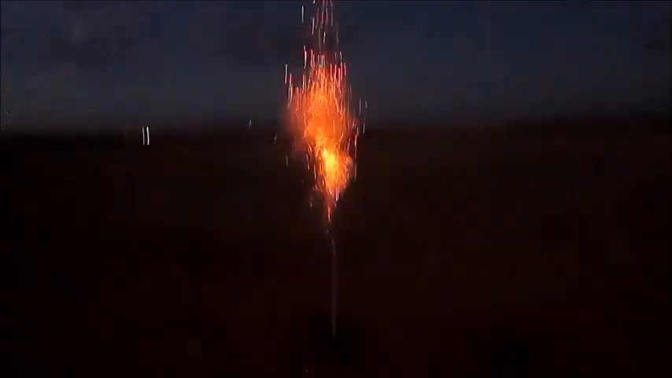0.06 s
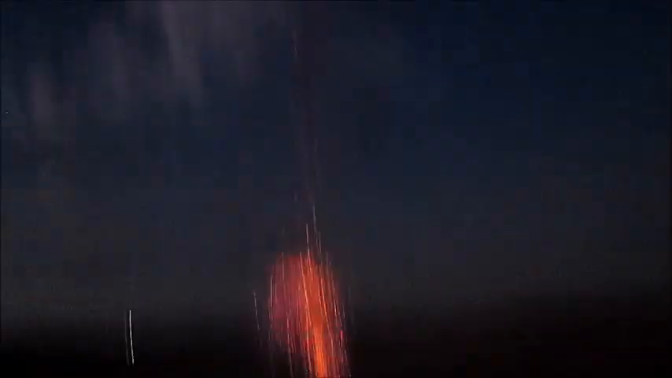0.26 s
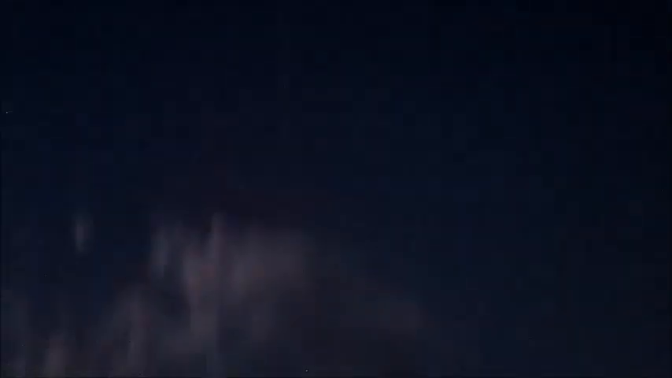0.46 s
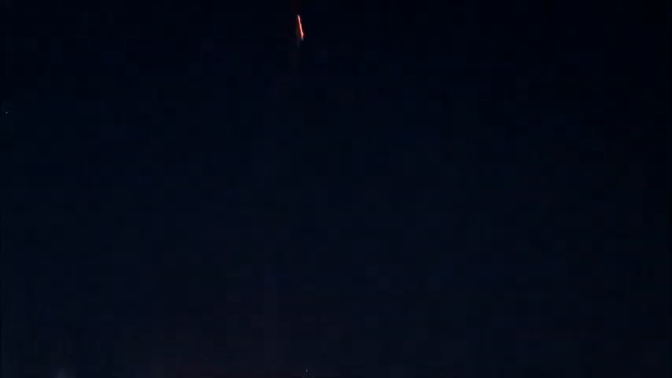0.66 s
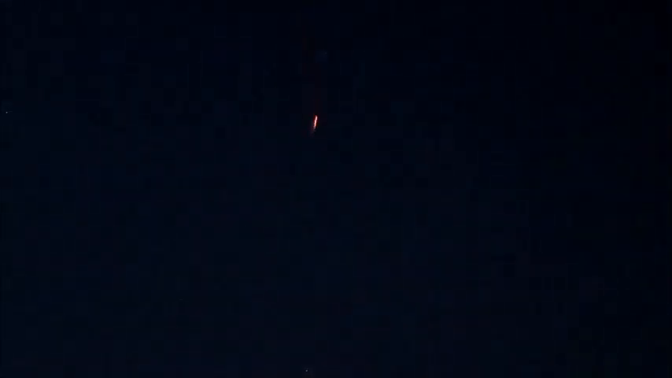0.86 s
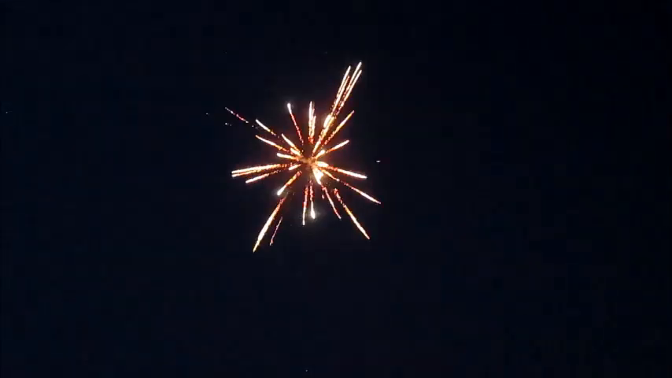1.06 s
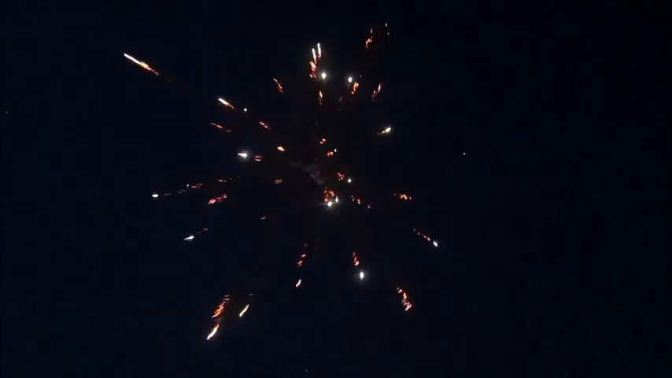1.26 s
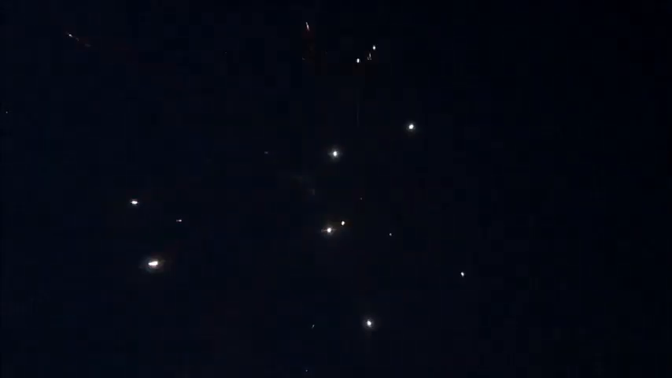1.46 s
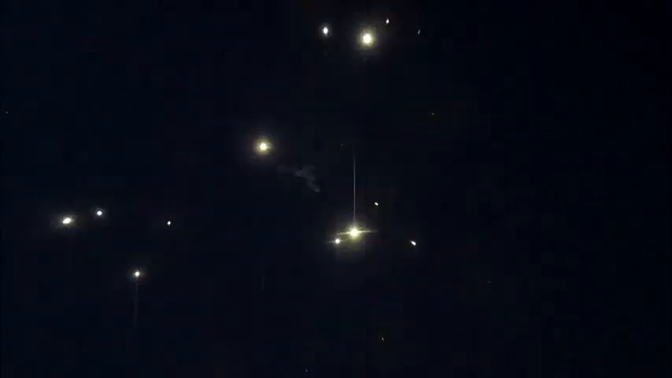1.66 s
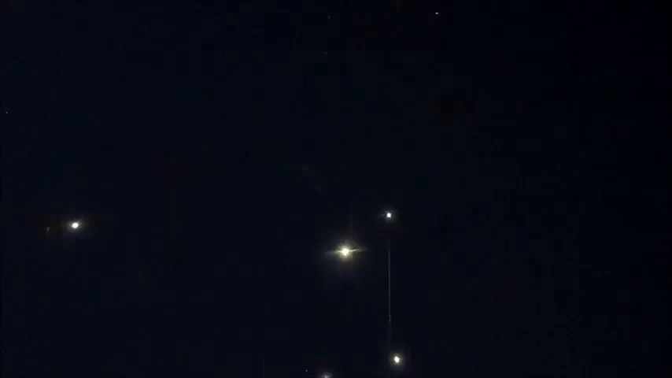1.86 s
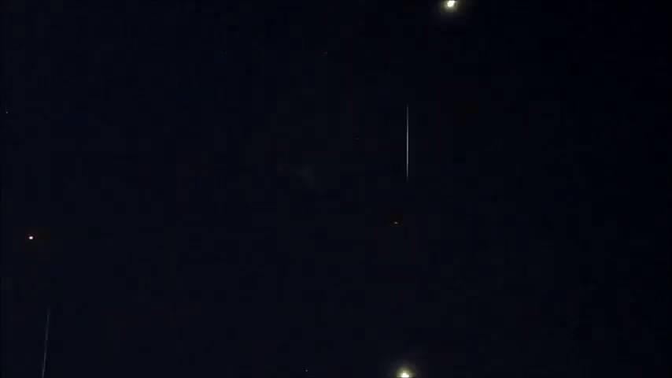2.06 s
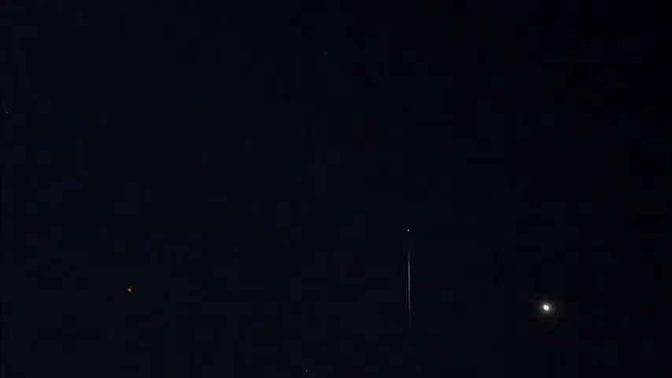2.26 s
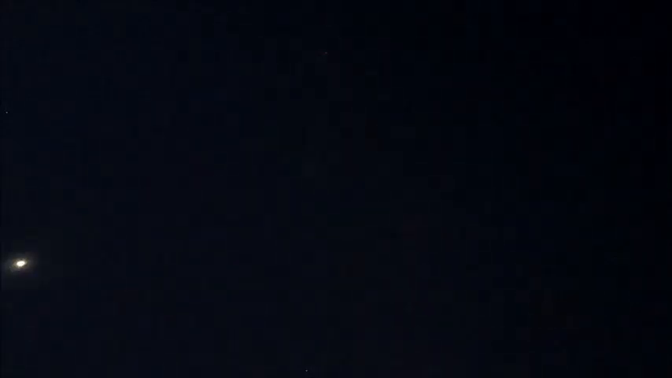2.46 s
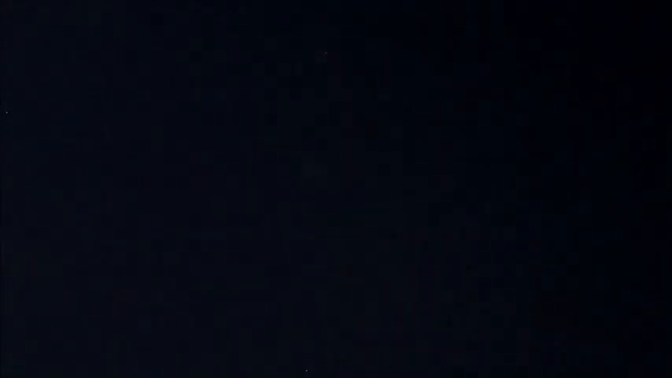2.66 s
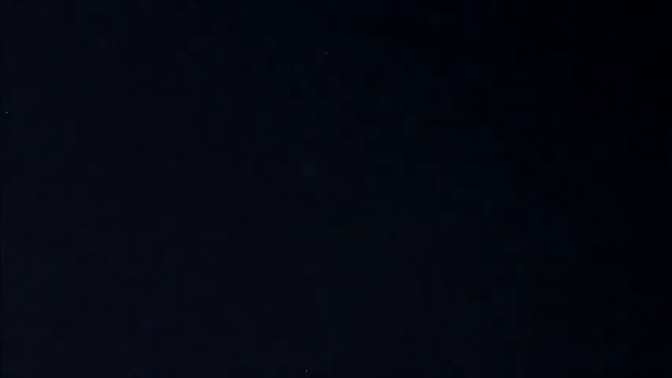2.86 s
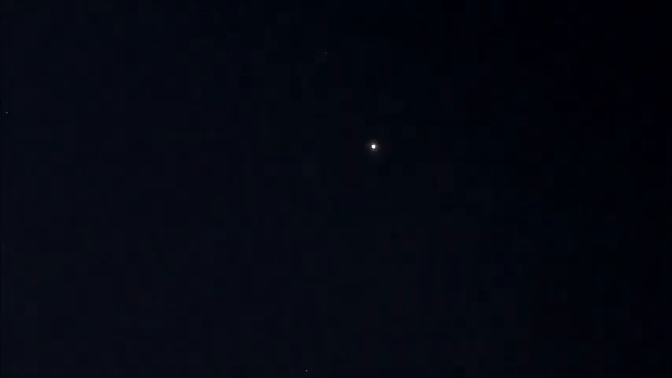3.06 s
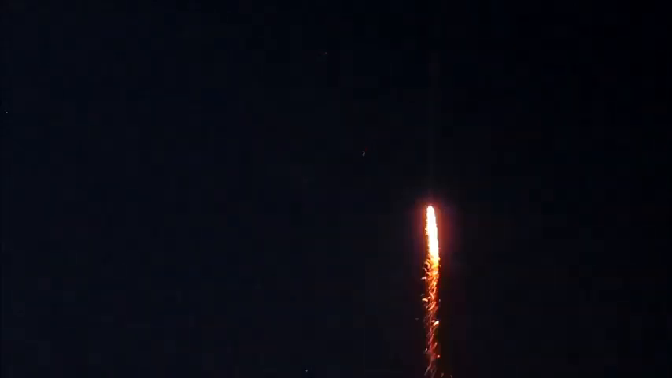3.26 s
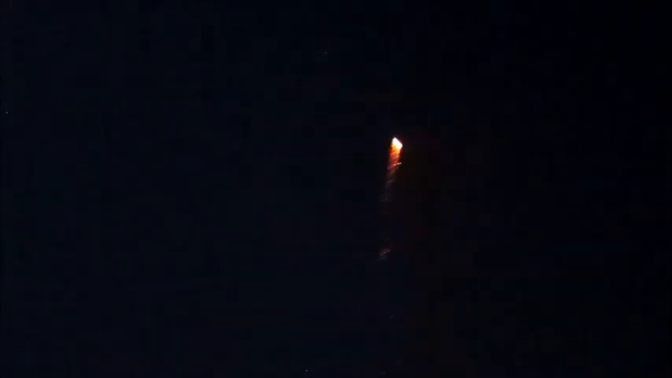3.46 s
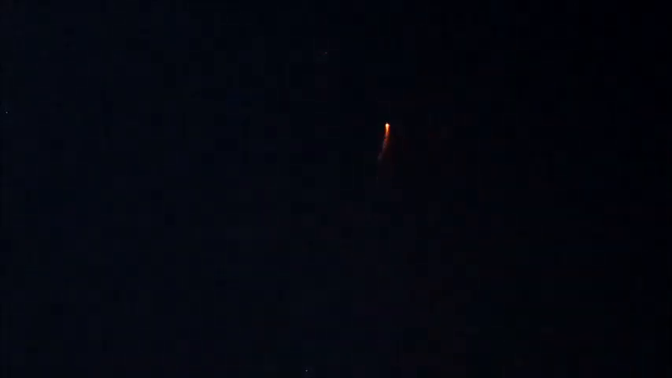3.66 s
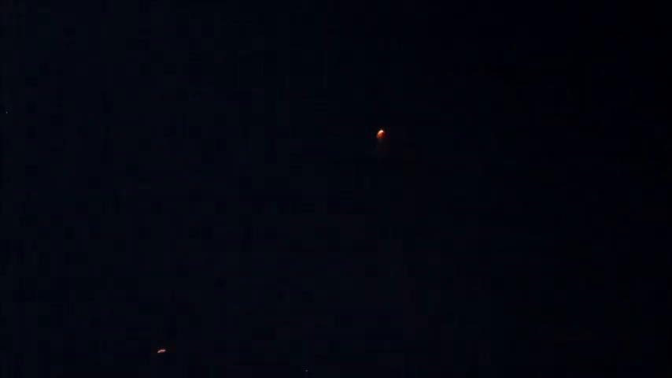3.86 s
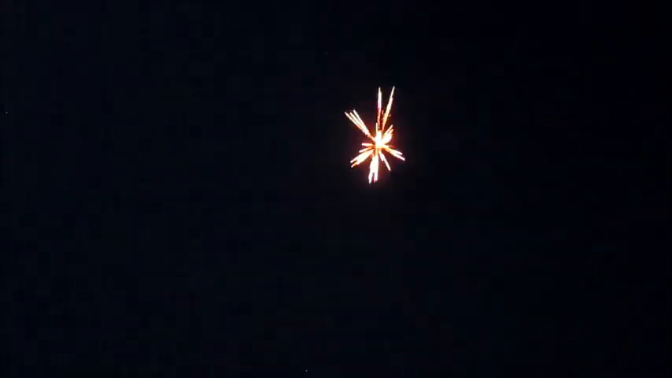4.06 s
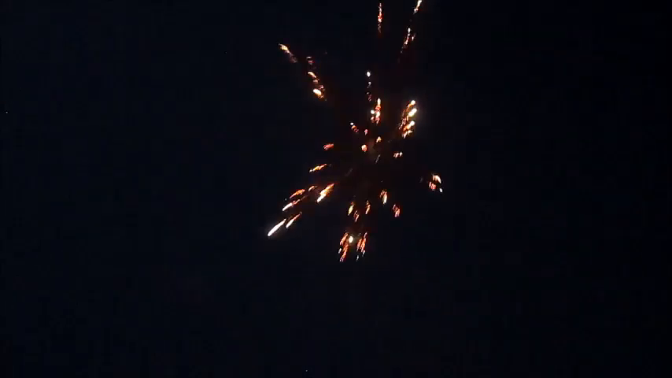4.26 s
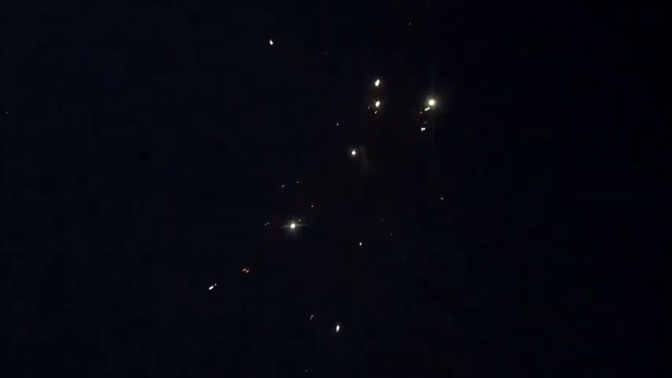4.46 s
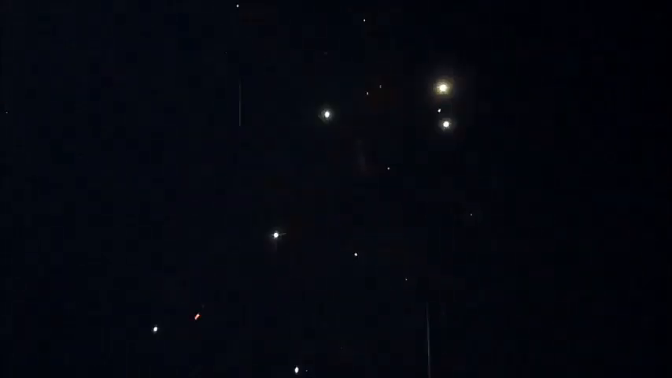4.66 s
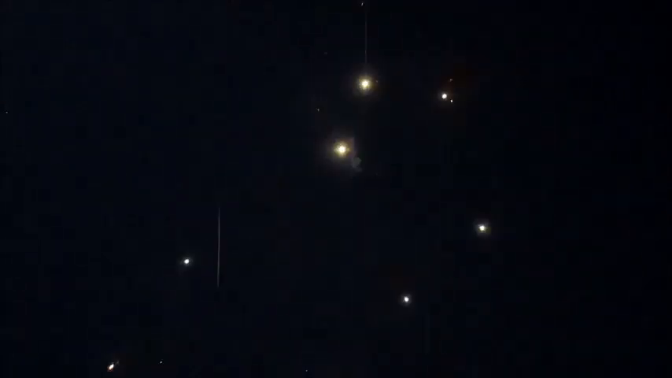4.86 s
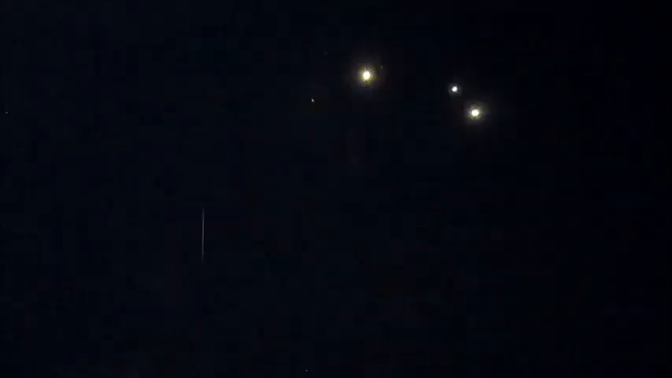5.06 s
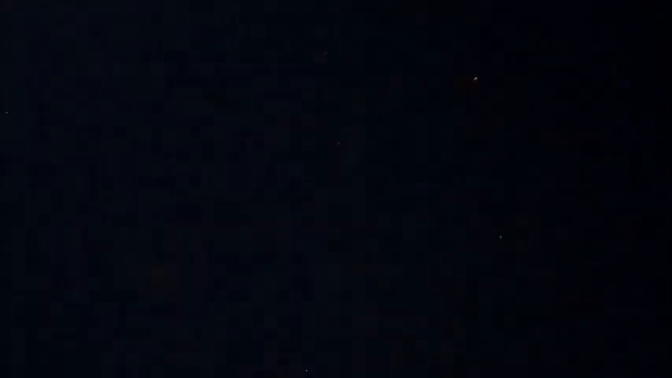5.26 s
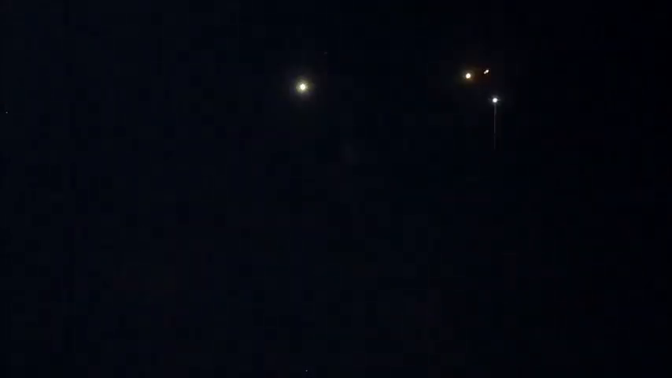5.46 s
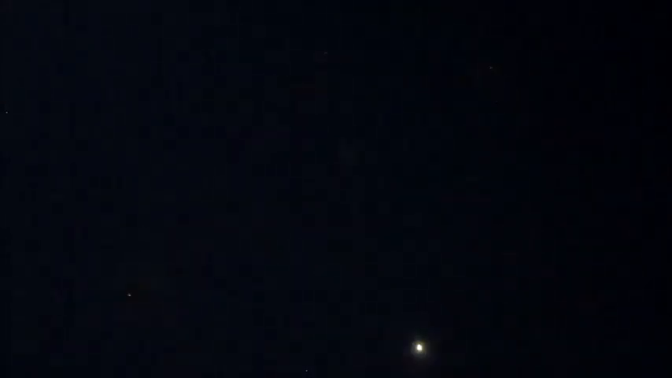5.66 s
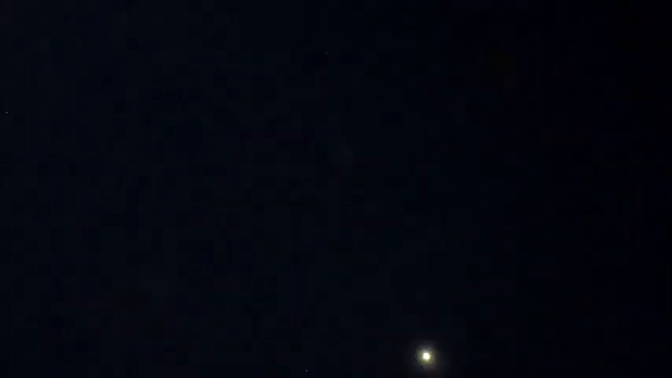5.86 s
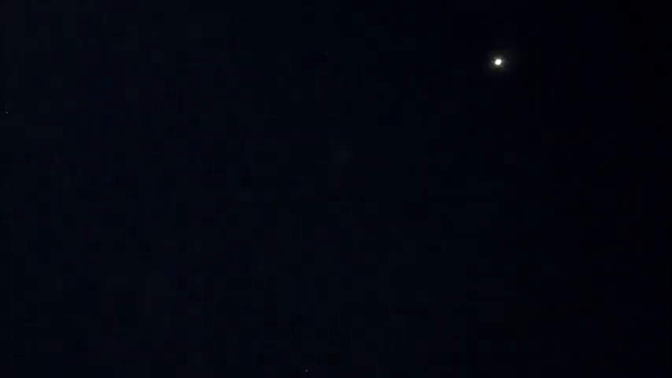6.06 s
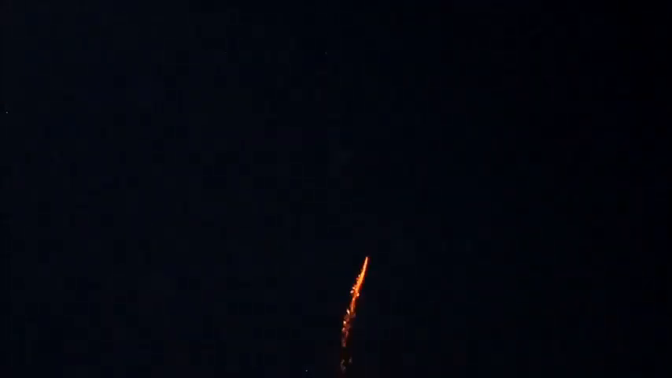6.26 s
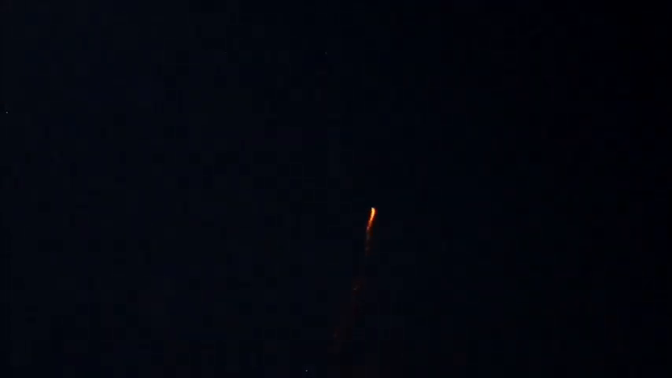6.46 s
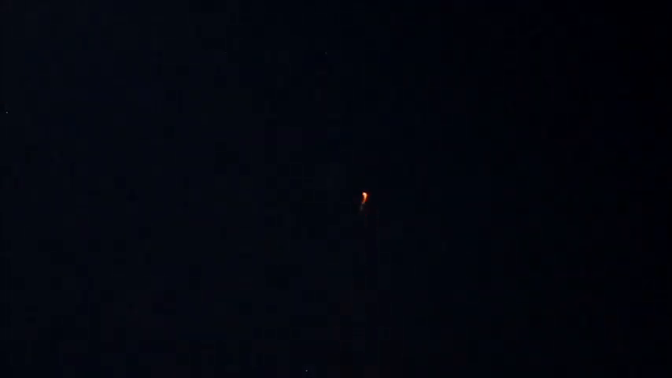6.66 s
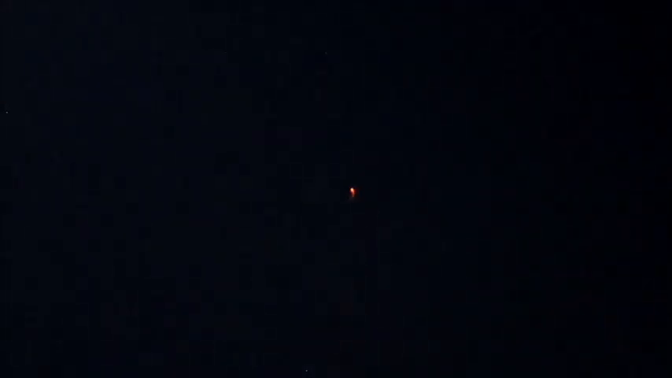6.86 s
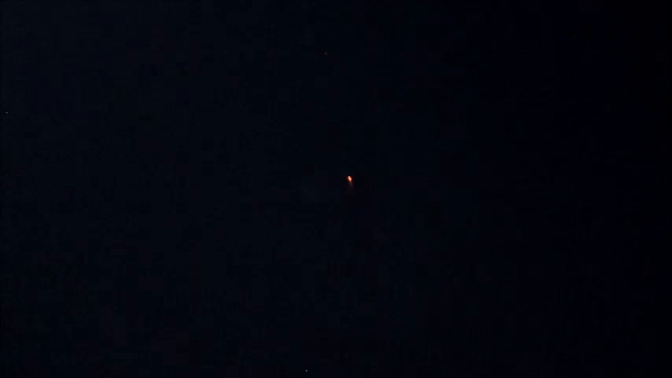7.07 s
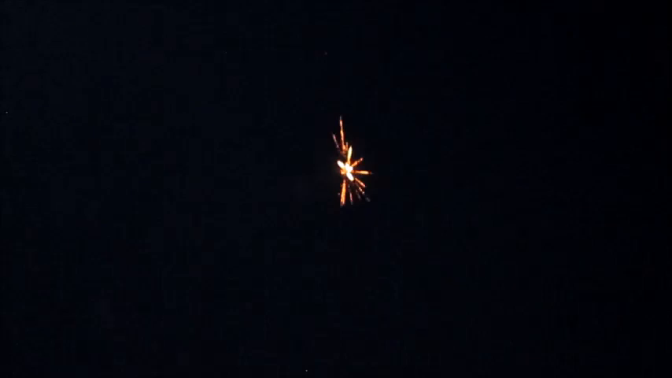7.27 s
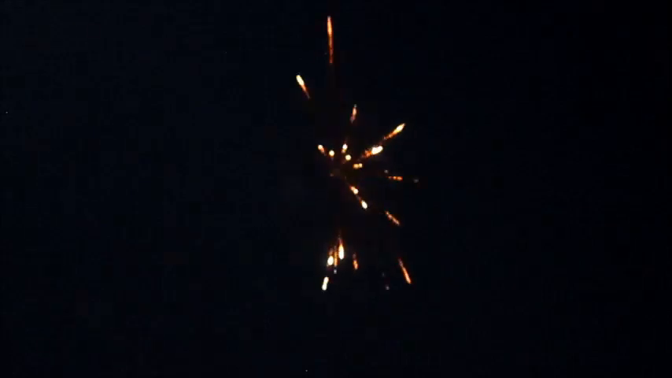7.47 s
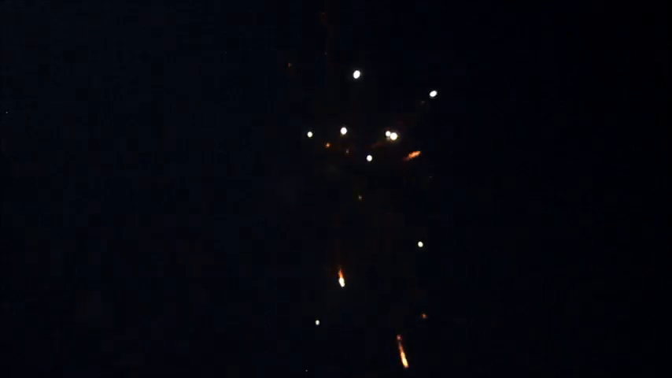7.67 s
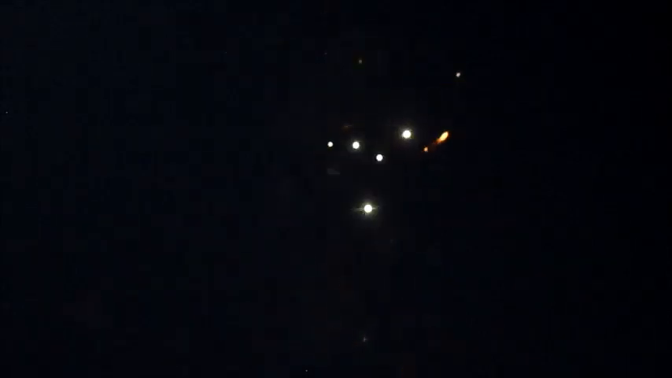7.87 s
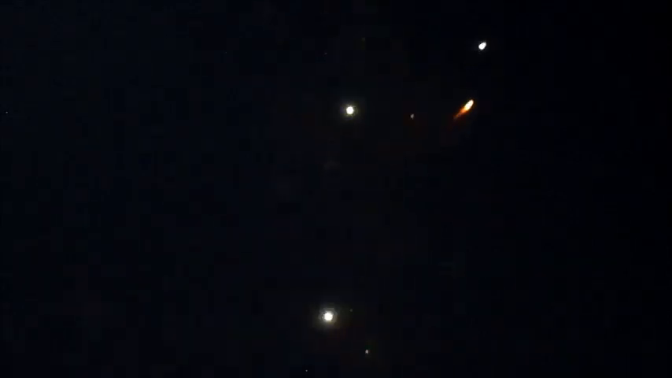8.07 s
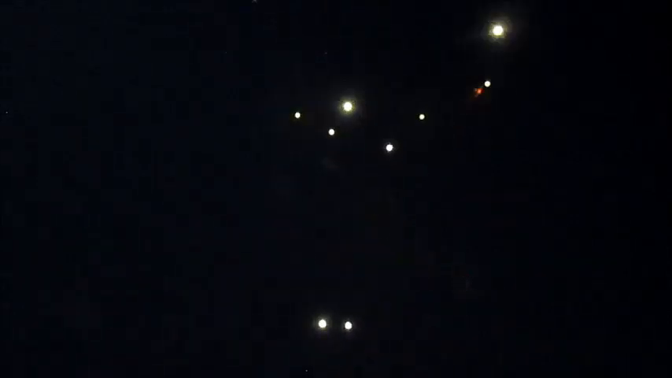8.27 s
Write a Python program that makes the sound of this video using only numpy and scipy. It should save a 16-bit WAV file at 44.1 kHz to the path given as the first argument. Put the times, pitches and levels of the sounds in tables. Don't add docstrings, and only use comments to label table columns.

```python
import sys
import numpy as np
from scipy import signal
from scipy.io import wavfile

SR = 44100
rng = np.random.default_rng(int(sys.argv[2]) if len(sys.argv) > 2 else 0)


def transcribe(signal):
    frames = np.atleast_2d(signal).T
    limited = np.clip(frames, -1, 1)
    pcm = np.round(limited * 32767).astype(np.int16)
    wavfile.write(sys.argv[1], SR, pcm)


def attenuation_scalar(level_db):
    decades = np.asarray(level_db, float) / 20
    return 10 ** decades


N = 366030

BURST_S = [1.05546, 4.12966, 7.35606]
LAUNCH_S = [-.095, 3.09824, 6.07497]
EARLY_S = [0, .0185, .033]
# [answer level/dB, extra edge level/dB]
ANSWERS = [(0, 0), (-3.5, 2), (-4, 2)]


def rms_one(x):
    return x / np.sqrt(np.mean(x ** 2) + 1e-20)


def in_time(rows, after_s=0):
    return np.interp(np.arange(N) / SR - after_s, *np.transpose(rows))


def at_hz(points, hz, order=1):
    points = np.array(points)
    return np.interp(np.log(hz), np.log(points[:, 0]), points[:, order])


def band(x, low_hz, high_hz):
    return signal.sosfilt(signal.butter(2, [low_hz, high_hz], "band", fs=SR, output="sos"), x)


def dull(x, cut_hz):
    return signal.sosfilt(signal.butter(2, min(cut_hz, .45 * SR), fs=SR, output="sos"), x)


def drift(rate_hz):
    r = np.exp(-80 * np.pi * rate_hz / SR)
    white = rng.standard_normal(N // 40 + 2002)
    slow = signal.lfilter([1], [1, -2 * r, r * r], white)[2000:]
    return np.interp(np.arange(N) / 40, np.arange(len(slow)), rms_one(slow))


def ring(clicks, hz, t60):
    r = attenuation_scalar(-60 / (t60 * SR))
    w = 2 * np.pi * hz / SR
    return signal.lfilter([0, np.sin(w)], [1, -2 * r * np.cos(w), r * r], clicks + 1e-18)


def coloured(spectrum, patchy_db, rate_hz):
    edges = 20 * 2 ** np.arange(0, 9.9, 1 / 3)
    white = rng.standard_normal((2, N))
    out = 0
    for k, (low, high) in enumerate(zip(edges, edges[1:])):
        hz = np.sqrt(low * high)
        if spectrum[0][0] < hz < spectrum[-1][0]:
            gain = attenuation_scalar(at_hz(spectrum, hz) + patchy_db * drift(rate_hz))
            out = out + gain * band(white[k % 2], low, high)
    return rms_one(out)


def notched(x):
    dips_hz = [3950, 8000]
    for hz in dips_hz:
        x = signal.lfilter(*signal.iirnotch(hz, hz / 170, fs=SR), x)
    return x


def ticks(size, per_s, depth):
    hits = (rng.random(size) < per_s / SR) * rng.uniform(.3, 1, size)
    return 1 - depth + depth * rms_one(dull(hits, 170))


def roll(table, ms, build_ms):
    white = rng.standard_normal((2, len(ms)))
    after = np.maximum(ms, 0)
    edges = 40 * 2 ** np.arange(0, 9, .5)
    out = 0
    for k, (low, high) in enumerate(zip(edges, edges[1:])):
        hz = np.sqrt(low * high)
        decay_db = 0.057 * after / at_hz(table, hz, order=2)
        out = out + attenuation_scalar(at_hz(table, hz) - decay_db) * band(white[k % 2], low, high)
    return 3.0 * notched(out) * (1 - np.exp(-after / build_ms))


def blast(ms, push_db, push_ms, suction_db, suction_ms, rise_ms=0.011):
    push = np.clip(ms / rise_ms + .5, 0, 1) * np.cos(np.pi / 2 * np.clip(ms / push_ms, 0, 1))
    suction = np.sin(np.pi * np.clip((ms - push_ms) / suction_ms, 0, 1) ** .75)
    return attenuation_scalar(push_db) * push - attenuation_scalar(suction_db) * suction


def add(out, s, voice, *row):
    start = round(s * SR) - 1323
    at = np.arange(start, start + 24000)
    out[at[at >= 0]] += voice((at / SR - s) * 1000, *row)[at >= 0]


def launch(ms, push_ms, lag_ms, puff_db, suck_db, leak_db, roll_db, fence_db):
    # [f/Hz, level/dB per Hz, t60/s]
    field_roll = [(60, -1.5, .15), (300, -1.5, 0.23), (895.7, -5, 0.38), (2000, -8, 0.42),
                  (3470, -13.5, .35), (6760, -23.5, 0.28), (14000, -37, .15)]
    # [f/Hz, level/dB per Hz, t60/s]
    fence_roll = [(100, 3, 0.21), (470, 8, 0.21), (1440, -5.5, 0.71), (3500, -10.5, 0.74),
                  (6600, -15, 0.16), (14000, -34, 0.13)]

    before = np.minimum(ms, 0)
    sizzle = rms_one(band(rng.standard_normal(len(ms)), 350, 2600))
    swell = (np.exp(before / 2.9) + 0.1 * np.exp(before / 6.8)) * (ms < -.4)
    leak = attenuation_scalar(leak_db) * sizzle * swell
    puff = dull(blast(ms + .62, puff_db, .36, suck_db, .4, rise_ms=.2), 5000)

    muzzle = blast(ms, 13, push_ms, -30, .1)
    ground = dull(blast(ms - lag_ms, 7.5, push_ms, -40, .1, rise_ms=.08), 6500)
    after = np.maximum(ms - .8 * push_ms, 0)
    fade = np.exp(-after / 5.2 - (after / 13) ** 4) * (after > 0)
    swing = -attenuation_scalar(.5) * np.cos(2 * np.pi * .07 * after) * fade
    report = dull(muzzle + ground + swing, 9000)

    post = np.sqrt(np.maximum(ms - 103, 0) / .3 + 81) - 9
    picket = .45 + 1.4 * np.exp(-(post % 1) / .3)
    fence = attenuation_scalar(fence_db) * picket * roll(fence_roll, ms - 103, build_ms=0.43)
    field = roll(field_roll, ms, build_ms=3.0) * (1 + 6 * np.exp(-np.maximum(ms, 0) / 12.0))
    return leak + puff + report + attenuation_scalar(roll_db) * field + fence


def ducking():
    depth_db, hold_s, launch_recover_s, burst_recover_s = 10, 0.083, 0.68, 1

    def dip(s, recover_s):
        return in_time([(0, 0), (.01, -depth_db), (hold_s, -depth_db), (hold_s + recover_s, 0)], s)

    dips = [dip(s, burst_recover_s) for s in BURST_S] + [dip(s, launch_recover_s) for s in LAUNCH_S]
    return np.min(dips, axis=0)


def air():
    # [f/Hz, level/dB per Hz]
    wind_colour = [(12, -37), (20, -11), (32, -3), (82, 2), (254, -16.5), (297, -14.5), (356, -19),
                   (450, -19.5), (580, -50.5), (990, -120)]
    # [t/s, level/dB]
    rumble_course = [(0, -47), (.5, -48), (1, -45.5), (1.55, -52), (1.72, -37.5), (1.85, -51.5), (3, -46.5),
                     (3.7, -48.5), (4.1, -50), (4.6, -47.5), (4.8, -51.5), (5.3, -51), (5.7, -48), (6, -47),
                     (6.7, -49), (7.3, -49.5), (7.85, -46.5), (8.3, -49)]
    # [f/Hz, level/dB per Hz]
    hiss_colour = [(2200, -18.5), (3000, -4), (3700, -8), (4500, -8.5), (6100, -12.5), (8000, -18),
                   (11000, -23), (15000, -22.5), (17500, -26)]
    # [f/Hz, level/dB per Hz]
    hum_colour = [(120, -32.5), (200, -3.5), (611, -8), (1000, -12), (1700, -20), (2000, -24.5),
                  (2600, -32), (3400, -57)]

    hiss_db, hiss_fall_db_per_s = -71.5, 1.2
    hum_db, hum_fall_db_per_s = -55.5, 0.33
    t = np.arange(N) / SR
    duck_db = ducking()
    wind = attenuation_scalar(in_time(rumble_course) + duck_db) * coloured(wind_colour, patchy_db=1.0, rate_hz=1.2)
    hiss_gain = attenuation_scalar(hiss_db - hiss_fall_db_per_s * t + 0.092 * duck_db)
    hiss = hiss_gain * coloured(hiss_colour, patchy_db=3.0, rate_hz=8.3)
    hum_gain = attenuation_scalar(hum_db - hum_fall_db_per_s * t + 0.98 * duck_db)
    hum = hum_gain * coloured(hum_colour, patchy_db=1.0, rate_hz=10.0)
    return wind + hiss + hum


def tube():
    # [start t/s, f/Hz, level/dB]
    pipe_modes = [(.3, 2150, -82), (5.3, 2173, -78), (.4, 2790, -76), (0.401, 3200, -72.5),
                  (2.2, 2770, -75), (2.199, 3130, -72), (2.301, 2100, -77), (3.4, 2130, -74),
                  (3.4, 3190, -77), (3.4, 3740, -83.5), (5.3, 2780, -77), (5.3, 3700, -85),
                  (6.35, 2250, -76.5), (6.5, 3210, -83)]
    t60 = 1.7 / 170
    out = np.zeros(N)
    for start, hz, db in pipe_modes:
        end = min(s for s in BURST_S + LAUNCH_S if s > start)
        at = np.arange(round(start * SR), round(end * SR))
        white = rng.standard_normal(len(at))
        tone = rms_one(ring(ring(white, hz, t60), hz, t60))
        fade_in = np.minimum(1, (at / SR - start) / 0.11)
        out[at] += attenuation_scalar(db) * tone * fade_in
    return out * attenuation_scalar(1.5 * drift(12.0))


def knocks():
    # [t/s, peak level/dB, f/Hz]
    gust_hits = [
        (0.347, -31.5, 100),
        (6.75, -38.5, 210),
    ]
    out = np.zeros(N)
    for s, db, hz in gust_hits:
        body = ring(ring(np.arange(6000) == 0, hz, 2.5 / hz), hz, 2.5 / hz)
        out[round(s * SR):][:6000] += attenuation_scalar(db) * body / np.abs(body).max()
    return out


def sputter():
    # [t/s, length/s, level/dB]
    flares = [(.5, 0.18, -76), (.605, .02, -81), (0.67, 0.071, -72), (0.845, 0.073, -77),
              (.945, 0.013, -71), (1.48, 0.052, -63), (1.712, .03, -74), (1.851, 0.099, -67),
              (1.917, 0.25, -56), (2.157, 0.033, -60.5), (2.167, 0.208, -58.5), (2.395, 0.027, -72),
              (2.474, 0.13, -62), (2.61, .02, -72), (2.64, .025, -68), (2.974, 0.099, -52.5),
              (3.115, .11, -63)]
    # [f/Hz, level/dB per Hz]
    powder_colour = [(1530, -34), (2600, -4.5), (3200, 0.5), (3850, -5), (4190, -3), (6500, 0), (8060, -7),
                     (9480, -4.5), (12500, -18), (16400, -27.5)]
    t = np.arange(N) / SR
    gain = np.zeros(N)
    for s, length, db in flares:
        arch = np.abs(np.sin(np.pi * np.clip((t - s) / length, 0, 1)))
        gain += attenuation_scalar(db) * arch ** .9
    return gain * coloured(powder_colour, patchy_db=2.0, rate_hz=25.0)


def burst(ms, push_ms, suction_ms, lag_ms, echo_db, bounce_db, roll_db, wall_db):
    # [f/Hz, level/dB per Hz, t60/s]
    field_roll = [(100, -13.5, .1), (400, -6, .12), (700, -3.5, 0.19), (1260, -1.5, 1), (2000, -7.5, 0.45),
                  (3500, -14.5, 0.69), (6660, -15.5, 0.17), (14000, -36, 0.11)]
    # [f/Hz, level/dB, t60/s]
    near_rings = [(1040, -24.5, 0.013), (1561, -13.5, 0.009), (2303, -22.5, 0.011), (3300, -23.5, 0.0077),
                  (60, -30.5, .05)]
    # [f/Hz, level/dB per Hz, t60/s]
    wall_roll = [(200, -9, 0.19), (457, 9.5, 0.16), (1010, 4, 0.62), (1790, -9, 0.18), (4000, -34, 0.34),
                 (14000, -60, .2)]

    direct = dull(blast(ms, 14, push_ms, 4, suction_ms), 11000)
    bounce = attenuation_scalar(bounce_db) * dull(blast(ms - 1.55, -6, .15, 0.5, .5), 5000)
    echo = blast(ms - lag_ms, 2.5, 1.2 * push_ms, 4.5, 1.1 * suction_ms, rise_ms=.2)
    ground = attenuation_scalar(echo_db) * dull(np.tanh(echo), 6500)

    half_sample_ms = 500 / SR
    kicks = 1. * (np.abs(ms - 1.3) < half_sample_ms) + .55 * (np.abs(ms - lag_ms - 1.2) < half_sample_ms)
    ringing = sum(attenuation_scalar(db) * ring(kicks, hz * rng.uniform(0.72, 1.3), t60) for hz, db, t60 in near_rings)

    close = roll(field_roll, ms - .9, build_ms=.3) * np.exp(-np.maximum(ms, 0) / 2.6)
    surge = 1 + 2.6 * np.exp(-np.maximum(ms - lag_ms, 0) / 11.0)
    field = roll(field_roll, ms - lag_ms, build_ms=0.18) * surge
    grain = ticks(len(ms), per_s=120.0, depth=0.35)
    wall = attenuation_scalar(wall_db) * grain * roll(wall_roll, ms - 78, build_ms=1.8)
    return direct + bounce + ground + ringing + attenuation_scalar(roll_db + 11.5) * close + attenuation_scalar(roll_db) * field + wall


def pops():
    lags_s = [.2565, .2855, .3565, .4275, .4395, .4715, .4815, .5905, .6095, .6455, .6605, .6785, .7025,
              .7265, .7895, .8205, .8345, .9135, .9935, 1.0265, 1.1405]
    # [peak level/dB, f/Hz, edge level/dB]
    reflectors = [(-41, 900, -5), (-42, 700, -5), (-42, 1090, -10), (-42, 800, -5), (-43, 800, 0),
                  (-44, 900, -3), (-42, 800, 0), (-43, 690, -1), (-41, 750, 1), (-43, 900, -3),
                  (-35, 1000, -2), (-40, 910, -1), (-43, 1000, -1), (-34, 850, -8), (-47, 1450, 0),
                  (-41, 656, 1), (-42, 970, 0), (-36, 1050, -6), (-45, 1000, -5), (-38, 1030, -5),
                  (-35, 1250, -6)]
    cycles = 6
    out = np.zeros(N + SR)
    click = np.arange(900) == 0
    for s, early_s, (answer_db, bright_db) in zip(BURST_S, EARLY_S, ANSWERS):
        for lag_s, (db, hz, edge_db) in zip(lags_s, reflectors):
            hz = hz * rng.uniform(.93, 1.07)
            body = ring(ring(click, hz, cycles / hz), hz, cycles / hz)
            edge = dull(ring(click, 2.2 * min(hz, 1050), 4.5 / hz), 3300)
            pop = body / np.abs(body).max() + attenuation_scalar(edge_db + bright_db) * edge
            out[round((s + lag_s - early_s) * SR):][:900] += attenuation_scalar(db + answer_db) * pop
    return out[:N]


def land():
    # [t after the burst/s, level/dB]
    scatter = [(.24, -50.5), (.4, -57), (.43, -51.5), (.495, -50.5), (.52, -57.5), (.58, -56), (.66, -46.5),
               (.735, -49.5), (.765, -56.5)]
    # [f/Hz, level/dB per Hz]
    far_colour = [(90, -30), (150, -1), (402, 0), (703, -1.5), (935, -1), (1700, -6.5), (2260, -18),
                  (3130, -15.5), (4000, -38.5), (5200, -63), (8800, -120)]
    tail_s, tail_db = 1.09, -55.5
    tail = [(scatter[-1][0] + 0.11, tail_db + 3.5), (tail_s, tail_db), (tail_s + 0.42, -80)]
    course = [(0, -90), *scatter, *tail]
    gain = np.zeros(N)
    for s, early_s, (answer_db, _) in zip(BURST_S, EARLY_S, ANSWERS):
        gain += attenuation_scalar(in_time(course, s - early_s) + answer_db)
    grain = ticks(N, per_s=150.0, depth=0.24)
    return gain * grain * coloured(far_colour, patchy_db=-1.8, rate_hz=59.0)


def scene():
    # [push/ms, ground echo lag/ms, early puff level/dB, its suction level/dB]
    launch_shapes = [(.27, 1.95, -4, -4), (.27, 1.98, -3.5, 0), (.265, 1.91, -6, -8)]
    # [gas leak level/dB, roll level/dB, fence level/dB]
    launch_levels = [(-16, -29.5, -49), (-12.5, -33, -46), (-16, -33, -47)]
    # [push/ms, suction/ms, ground echo lag/ms, ground echo level/dB, near bounce level/dB]
    burst_shapes = [(.33, .72, 10.62, -2.6, -8), (.37, .74, 11.07, -2.7, -11), (.41, .62, 11.07, -2.6, -18)]
    # [roll level/dB, far wall level/dB]
    burst_levels = [(-30.5, -40), (-33, -42.5), (-36, -48)]

    diffuse = notched(air() + sputter() + land())
    out = diffuse + tube() + knocks() + pops()
    for s, shape, levels in zip(LAUNCH_S, launch_shapes, launch_levels):
        add(out, s, launch, *shape, *levels)
    for s, shape, levels in zip(BURST_S, burst_shapes, burst_levels):
        add(out, s, burst, *shape, *levels)
    return out[None]


def low_pass(x):
    return signal.sosfilt(signal.butter(12, 16520, fs=SR, output="sos"), x)


def record(dry):
    overloaded = np.clip(dry, -1.08, 1.08)
    flat = dull(overloaded, 10000)
    flat += attenuation_scalar(-97) * band(rng.standard_normal(flat.shape), 9000, 16500)
    return low_pass(np.clip(flat, -1, 1))


dry = scene()
out = record(dry)
transcribe(out)
```